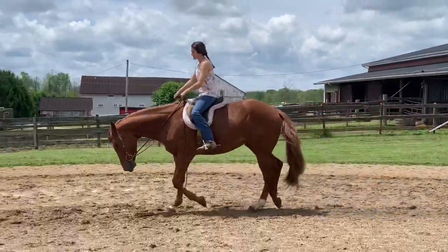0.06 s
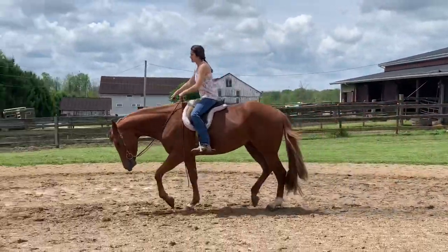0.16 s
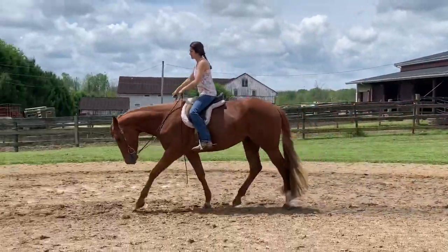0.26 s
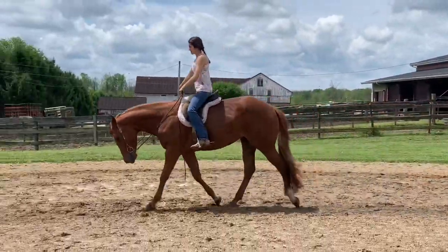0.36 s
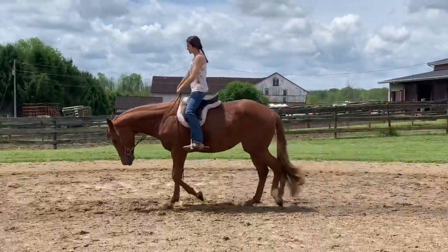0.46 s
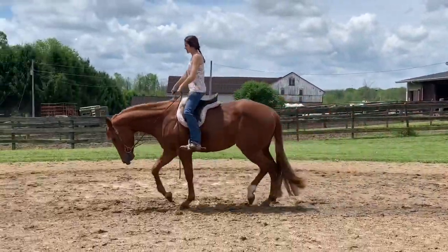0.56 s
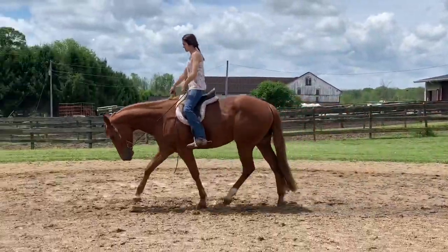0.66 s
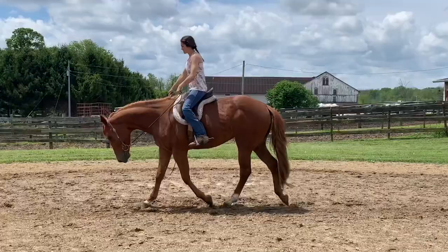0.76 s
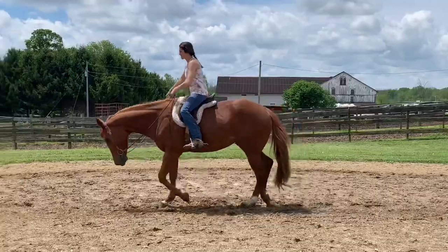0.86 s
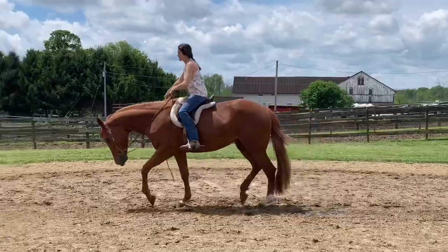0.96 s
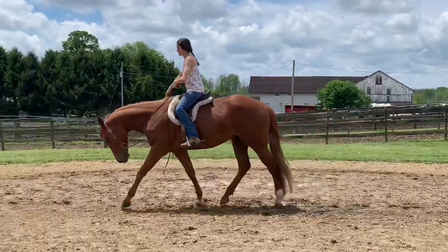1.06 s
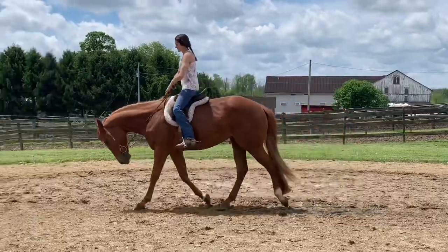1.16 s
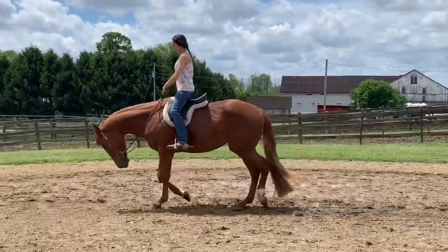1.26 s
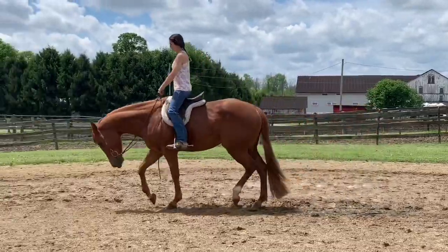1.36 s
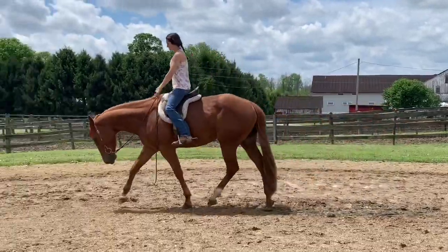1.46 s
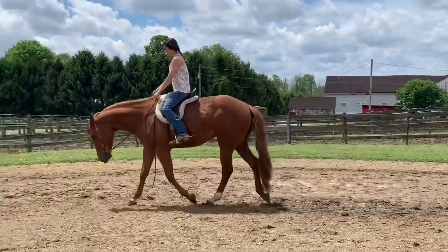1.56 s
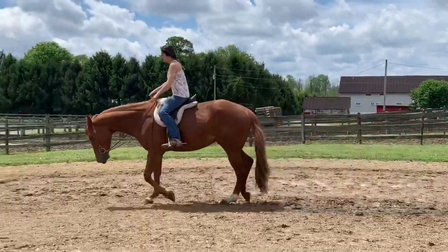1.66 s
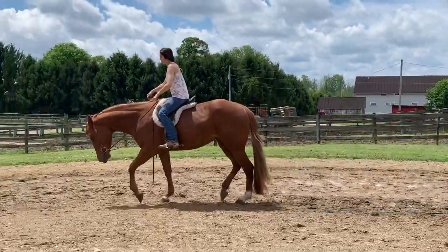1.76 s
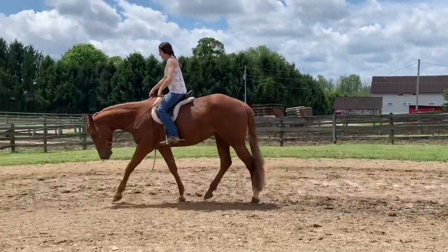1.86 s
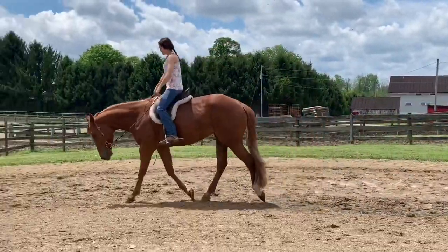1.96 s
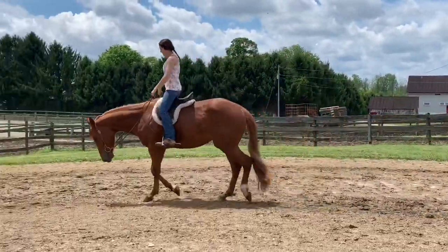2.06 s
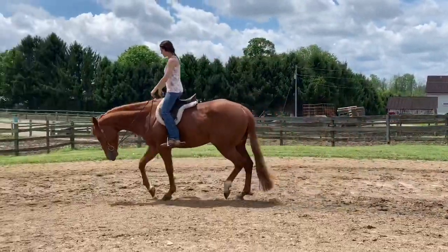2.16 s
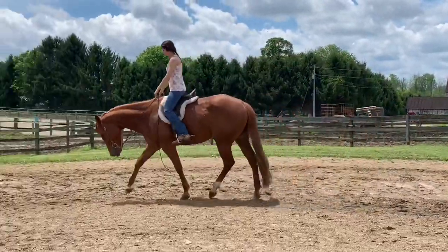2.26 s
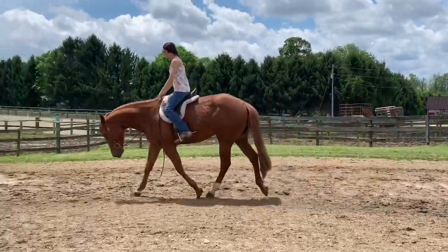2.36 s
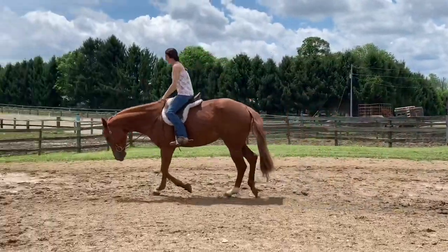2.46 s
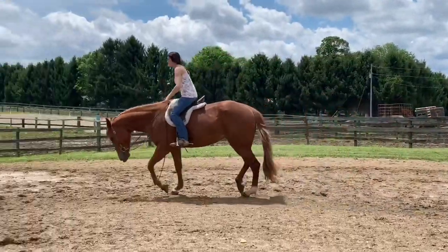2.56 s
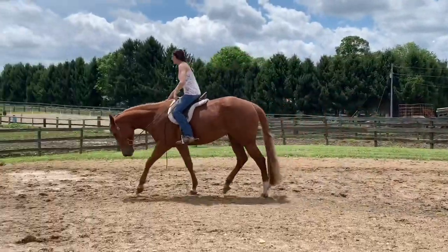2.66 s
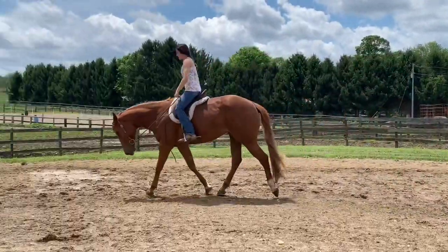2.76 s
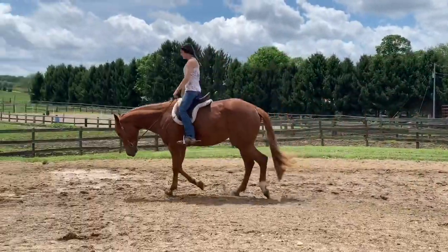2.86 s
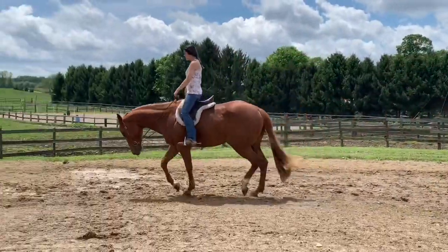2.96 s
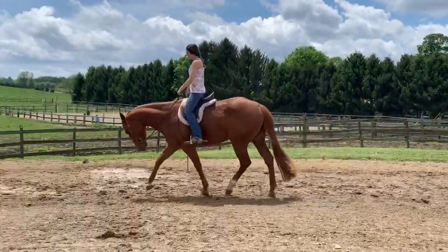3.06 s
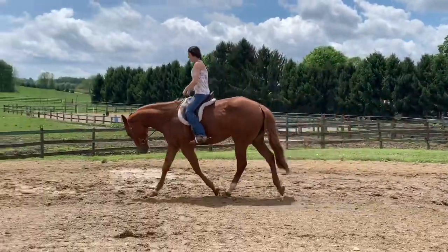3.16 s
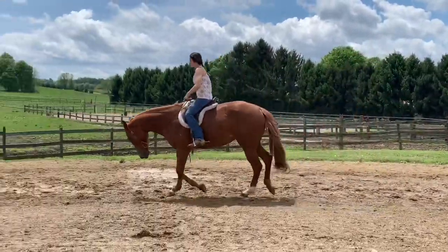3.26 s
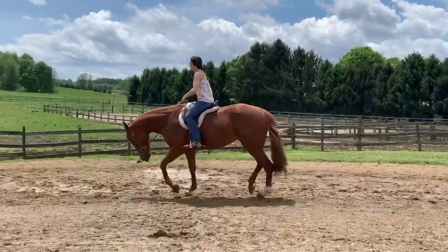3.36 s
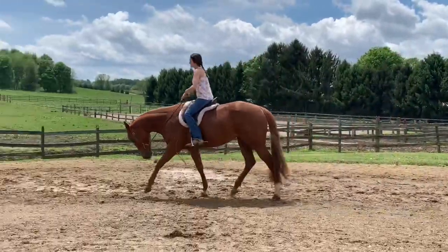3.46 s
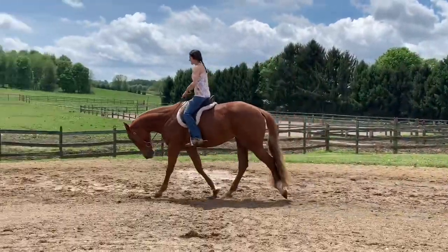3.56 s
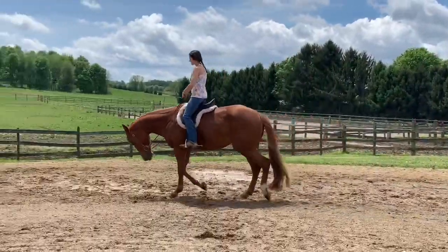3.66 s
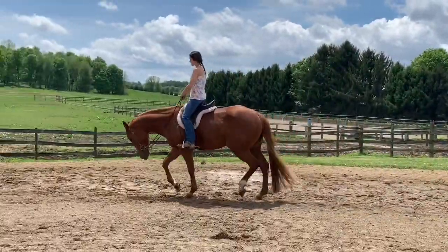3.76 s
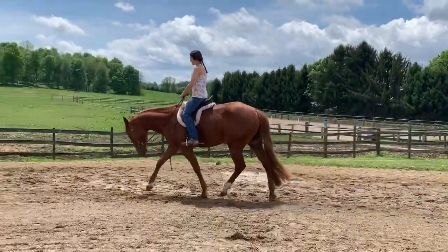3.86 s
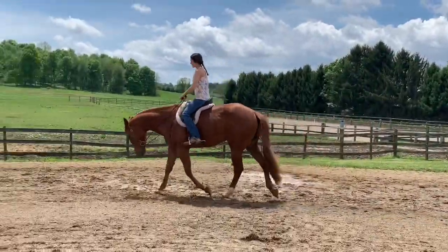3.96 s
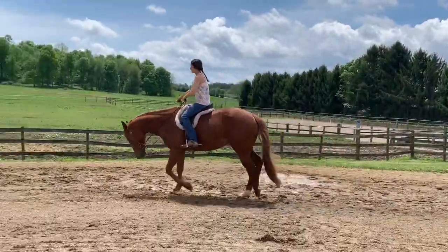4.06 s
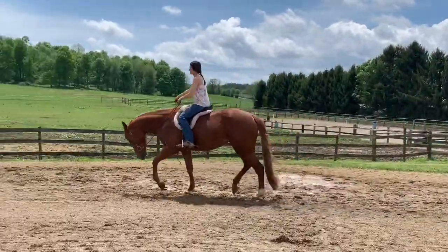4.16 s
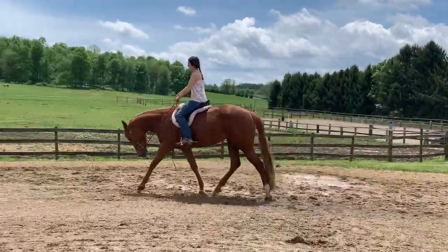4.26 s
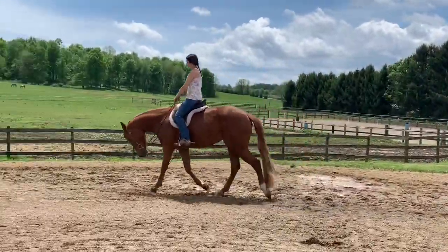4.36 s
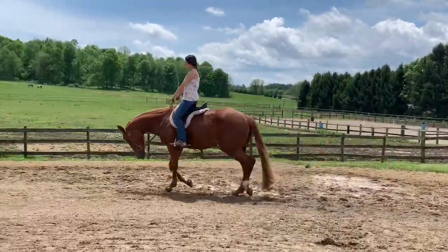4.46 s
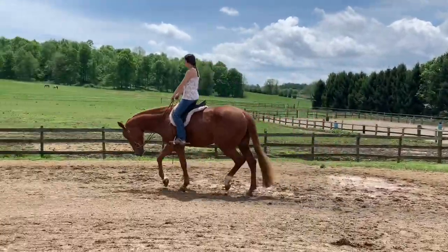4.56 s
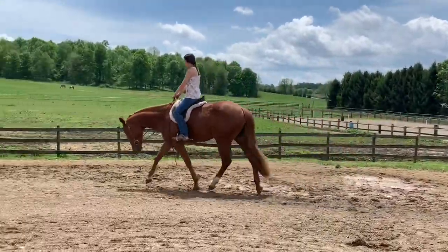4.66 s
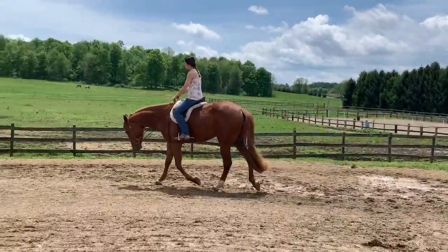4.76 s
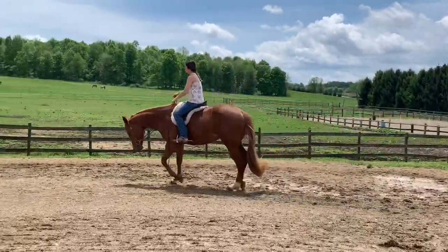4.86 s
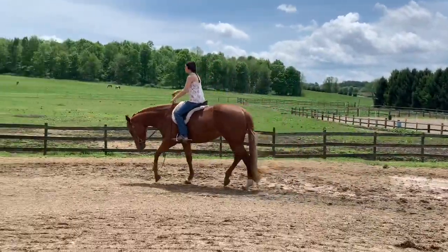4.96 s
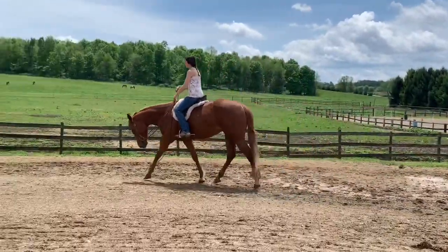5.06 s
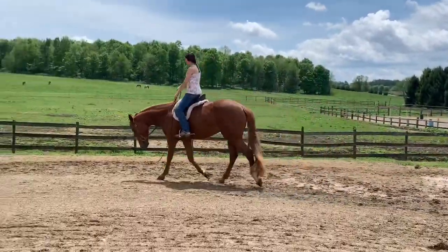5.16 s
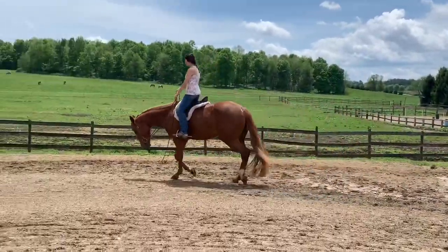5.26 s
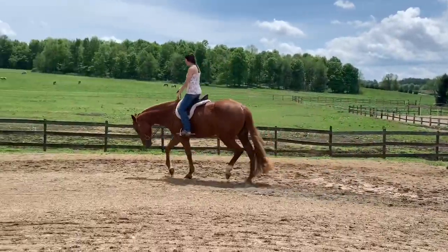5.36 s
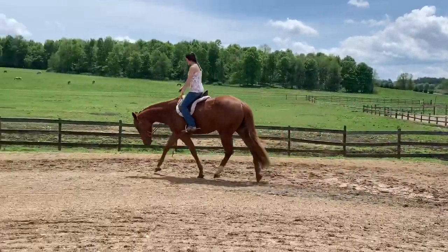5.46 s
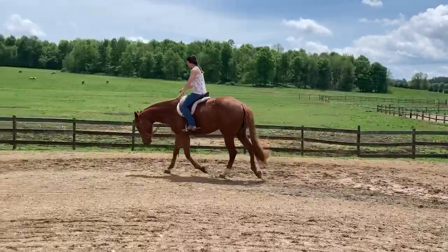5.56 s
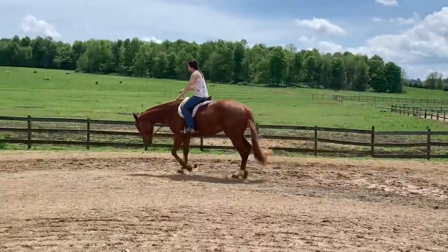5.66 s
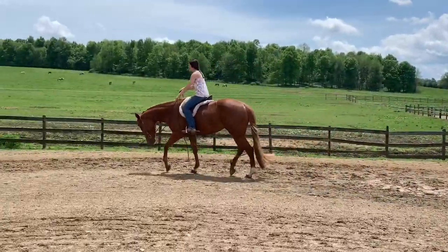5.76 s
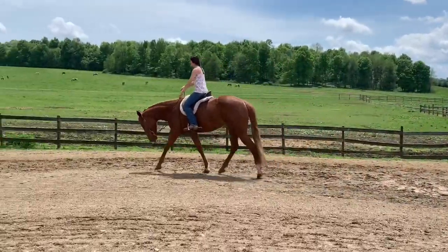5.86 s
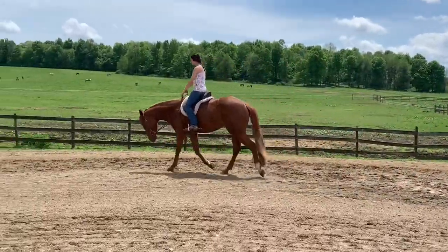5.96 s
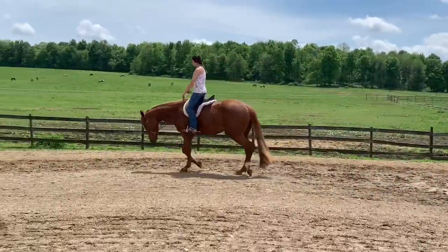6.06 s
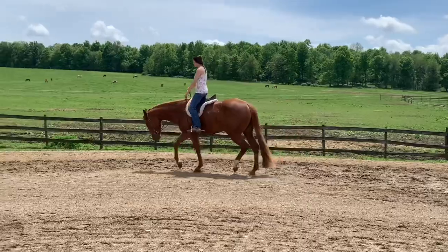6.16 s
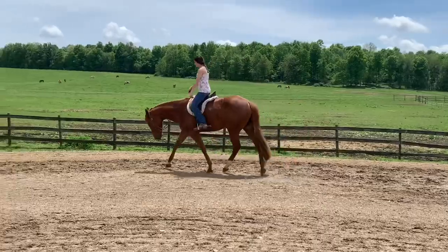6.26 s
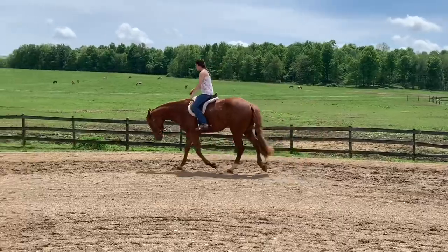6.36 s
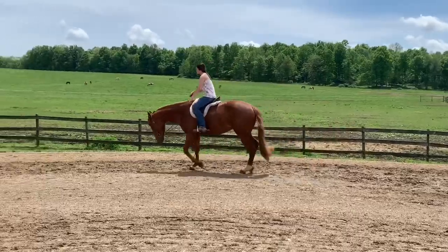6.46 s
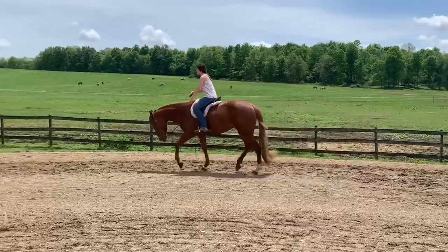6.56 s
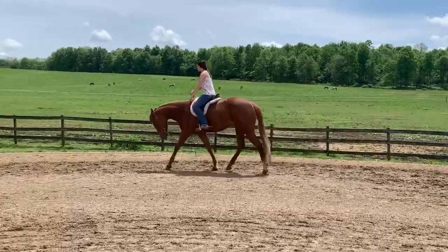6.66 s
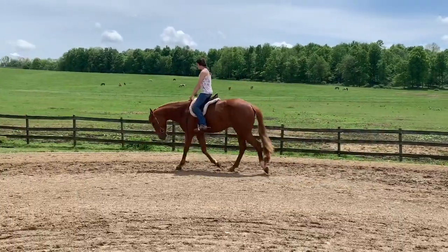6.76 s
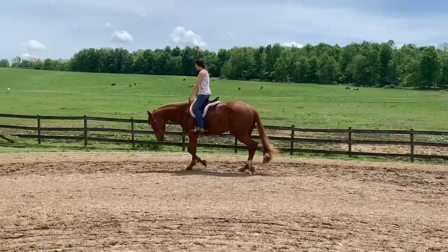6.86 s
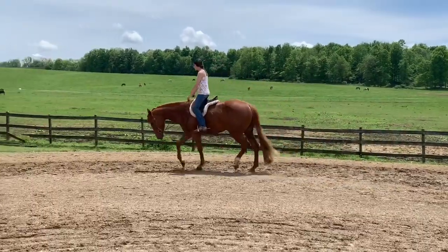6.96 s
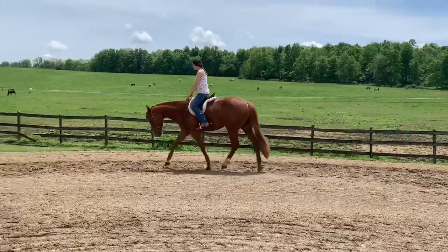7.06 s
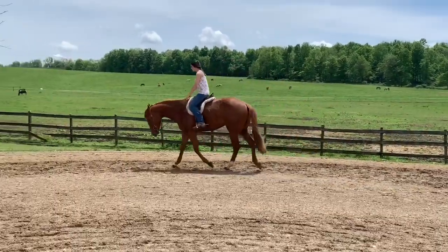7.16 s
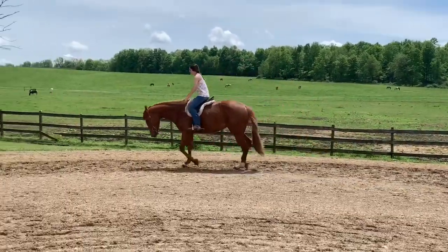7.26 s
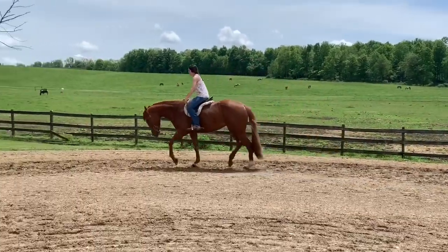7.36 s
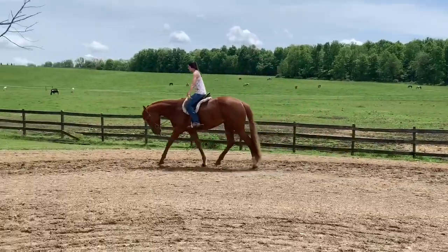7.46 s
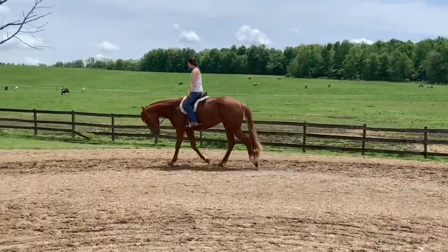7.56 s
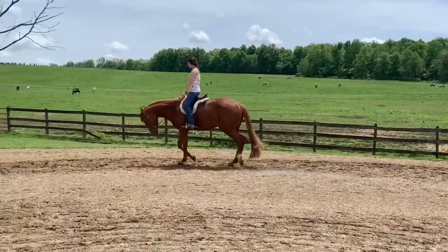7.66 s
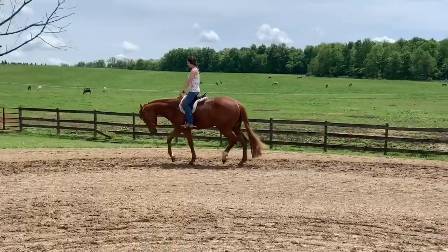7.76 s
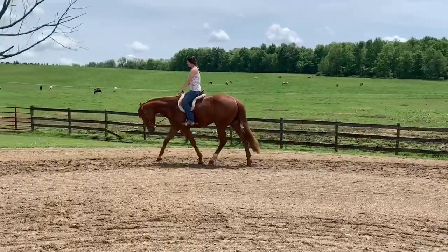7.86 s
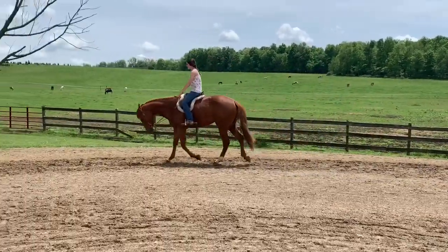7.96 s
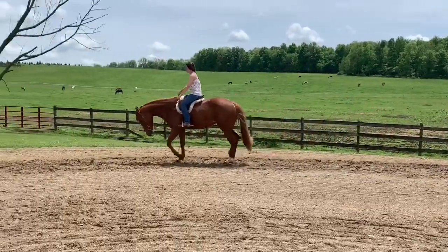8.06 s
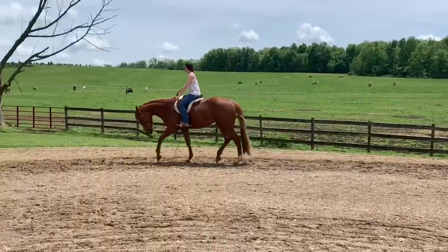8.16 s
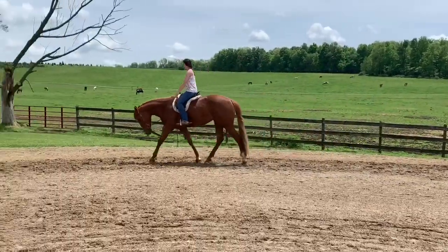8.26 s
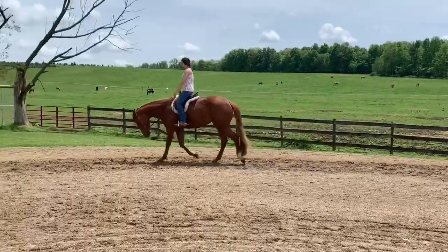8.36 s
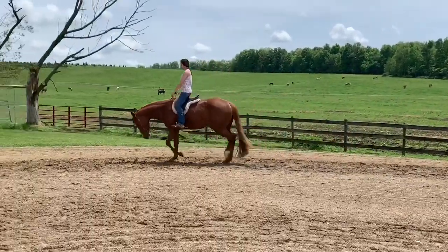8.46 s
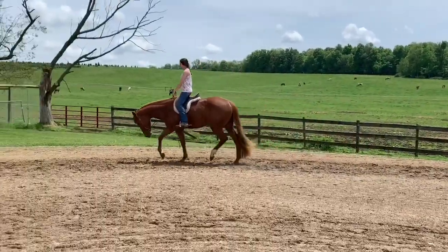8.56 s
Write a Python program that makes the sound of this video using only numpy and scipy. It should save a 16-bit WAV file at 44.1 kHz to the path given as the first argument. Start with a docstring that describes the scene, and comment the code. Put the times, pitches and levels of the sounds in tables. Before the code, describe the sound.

In an open riding arena a phone picks up a horse walking at an easy pace: grit cracking, sand hissing and scuffing, muted thuds, saddle leather creaking and popping. A deep engine hum throbs nearly twice a second, fading toward the end. Sparrow chirps and thin high peeps come and go, then brighter whistled phrases and buzzy calls. The crunching is strongest early and grows lighter later.

```python
"""A beating motor drone, low rumble and hiss run throughout with birds, while a horse walks on dry sand from
the start: hooves thud, crunch and throw up grains, and the saddle creaks and pops.
Drone and birds are sines of moving level and pitch; rumble, hiss and wind are filtered noise.
Sand is a crowd of ringing grains, crunches are noise bursts, thuds are damped modes, and leather is
stick-slip driving resonators. A phone's two microphone ports hear it with lags and coloration."""
import sys
import numpy as np
from scipy import signal
from scipy.fft import rfft, irfft
from scipy.io import wavfile
from scipy.ndimage import uniform_filter1d

SR = 44100
rng = np.random.default_rng(int(sys.argv[2]) if len(sys.argv) > 2 else 0)


def digitize_waveform(pressure):
    """Quantize a signal to 16-bit integers and store it at the path in sys.argv[1].

    Rows of a 2-D input are taken as channels; values are limited to [-1, 1].
    """
    field = np.atleast_2d(pressure).T
    bounded = np.clip(field, -1, 1)
    quanta = np.round(bounded * 32767).astype(np.int16)
    wavfile.write(sys.argv[1], SR, quanta)


N = 379239  # length [samples]

# distant hiss: (frequency [Hz], spectral level [dB])
AIR_COLOUR = [(260, -41), (450, 1.5), (922, 2.5), (2070, 2), (3760, 2), (8540, -18), (10200, -30),
              (12400, -62), (13600, -53), (14800, -36), (16000, -57)]
AIR_DB, AIR_FADE_DB = -55.5, -0.5  # level before swell and flicker; change by the end
# rumble level: (time [s], level [dB])
RUMBLE_LEVEL = [(0, -45.5), (.9, -46), (1.2, -44.5), (1.55, -44.5), (3.4, -45.5), (4.3, -45.5),
                (5.1, -43.5), (6.2, -44), (7.2, -46), (8.6, -47)]
# rumble spectrum: (frequency [Hz], spectral level [dB])
RUMBLE_COLOUR = [(27, -19), (39, -26), (46, -1), (70, -1), (140, -2), (200, -3), (300, -13), (390, -20),
                 (480, -32), (600, -53)]
# murmur near the top of the rumble: (time [s], level [dB])
MURMUR_LEVEL = [(0, -75.5), (4.2, -63.5), (4.8, -59), (6, -63.5), (7.5, -61), (8.1, -65), (8.6, -74)]

# steady low tones: (frequency [Hz], level [dB], wavering depth [dB], change by the end [dB])
LOW_TONES = [(49.3, -49, 2, -2.5), (72.2, -53, 2.5, -1), (122.56, -42, 0.7, -6.5), (151.2, -56, 5, 1),
             (183.2, -48.5, 4, -5.5), (197.6, -49.5, 1, -10), (225.8, -61.5, 4.5, -1.5),
             (273.4, -56.5, 4.5, -9), (309.8, -62.5, 3.5, -5), (365.6, -69.5, 7.5, -7)]
# two beating motor tones: (time [s], upper level [dB], lower level [dB])
DRONE_LEVELS = [(0, -36.5, -48), (1.3, -39.5, -39.5), (2.4, -46, -46.5), (4.2, -43.5, -49), (5.4, -44, -52),
                (6.5, -50, -46), (8.6, -77, -51.5)]
DRONE_HZ, BEAT_S, CANCEL_S = 91.6, 0.5764, 3.285  # upper tone, beat period, a moment of opposition

# wind gusts: (peak time [s], 20 dB rise time [s], 20 dB fall time [s], level [dB])
GUSTS = [(1.2, 0.78, 0.5, -37), (3.1, 1.2, 0.7, -53), (6.3, 1.5, 1.2, -45)]

# near whistling bird: (start [s], length [s], pitch at start [Hz], middle [Hz] and end [Hz],
# level [dB], tilt from start to end [dB])
WHISTLE_NOTES = [(4.56, 0.038, 3370, 3350, 3180, -55.5, 4), (4.588, 0.034, 3160, 2850, 2540, -44.5, 10),
                 (4.624, 0.036, 2534, 2290, 2230, -49, -3), (4.662, 0.025, 2140, 2090, 2010, -49, 8),
                 (4.69, 0.034, 2550, 2450, 2600, -51.5, 3), (4.716, 0.036, 2560, 2800, 2600, -45, -10),
                 (4.758, 0.12, 2070, 2360, 2316, -47.5, 11), (5.16, 0.02, 2920, 2950, 2980, -56, 3),
                 (5.167, 0.037, 2430, 2610, 2830, -46.5, 20), (5.205, 0.037, 2840, 2840, 2830, -50, 0),
                 (5.242, 0.052, 2820, 2840, 2700, -48.5, 19), (5.3, 0.034, 2420, 2460, 2460, -41, -4),
                 (5.332, 0.11, 2510, 2520, 2380, -50.5, -6), (5.7, 0.031, 2530, 2800, 3370, -49, 19),
                 (5.733, 0.047, 3380, 2950, 2700, -36.5, 7), (5.772, 0.022, 2700, 2350, 2230, -38.5, 7),
                 (5.795, 0.061, 2350, 2303, 2170, -41, -10), (5.859, 0.061, 2325, 2433, 2230, -40, 3),
                 (5.92, 0.024, 2040, 2010, 2000, -42, -2), (6.757, 0.019, 2350, 2440, 2480, -56, 14),
                 (6.781, 0.025, 2520, 2660, 2700, -39.5, 14), (6.82, 0.027, 3420, 3380, 3320, -46.5, 4),
                 (6.847, 0.031, 3040, 2910, 2730, -40, -19), (6.878, 0.037, 2040, 2235, 2170, -48, -4),
                 (6.915, 0.044, 2180, 2100, 2080, -44.5, -4), (6.968, 0.053, 3080, 2750, 2570, -38, 14),
                 (7.036, 0.051, 2520, 2465, 2370, -49, 15), (7.1, 0.038, 2590, 2750, 2520, -57, 0),
                 (7.155, 0.031, 2480, 2460, 2460, -65, 0)]
# fast warble of arches: (start [s], length [s], three pitches [Hz], level [dB], tilt [dB])
WARBLE_NOTES = [(6.293, 0.029, 2190, 2600, 2900, -51, 10), (6.322, 0.021, 3020, 3060, 3020, -35.5, 3),
                (6.341, 0.012, 2800, 2400, 1950, -45.5, -3), (6.358, 0.036, 2610, 2790, 1920, -44.5, -6),
                (6.402, 0.0183, 2960, 2830, 2300, -42, -10), (6.422, 0.032, 2250, 2180, 2060, -52, -9)]
# fainter, higher birds: (start [s], length [s], three pitches [Hz], level [dB], tilt [dB])
PEEP_NOTES = [(.075, 0.034, 3190, 3360, 3580, -54, 0), (.11, .105, 3610, 3524, 3390, -56.5, 2),
              (.21, 0.025, 5580, 5530, 5200, -55, 9), (.685, 0.041, 5700, 5460, 5070, -59, -3),
              (.72, 0.048, 3900, 3920, 3920, -57, -11), (1.017, 0.038, 3920, 3910, 3920, -55, 3),
              (1.285, 0.054, 3870, 3840, 3830, -53.5, 0), (1.53, 0.047, 3650, 3840, 3640, -54.5, -3),
              (1.65, 0.085, 7360, 7400, 7440, -71, -5), (1.825, 0.019, 5160, 5160, 5170, -58.5, 3),
              (1.9, 0.026, 5740, 5200, 4750, -57, 2), (2.265, 0.024, 5350, 5270, 5140, -60, -6),
              (2.32, 0.0092, 3440, 3150, 2900, -56, 0), (2.59, 0.07, 6560, 6420, 6380, -59.5, -2),
              (2.695, 0.012, 3380, 3100, 2820, -58, 9), (2.85, 0.02, 4980, 4940, 4870, -58, -2),
              (3.465, 0.027, 5350, 5270, 5170, -66, 0), (2.105, 0.049, 3320, 3480, 3630, -56.5, -1),
              (2.182, .02, 4700, 4950, 5300, -61, 0), (3.175, .025, 2880, 2890, 2860, -62, 5),
              (3.285, 0.037, 3510, 3480, 3450, -61, 9), (3.378, 0.042, 3580, 3950, 4270, -63, -3),
              (3.413, 0.046, 4280, 4200, 4020, -63, -3), (4.272, .025, 4450, 4700, 4850, -59, 0),
              (4.365, .025, 3950, 4200, 4400, -57, 0), (4.41, .03, 3220, 3330, 3500, -54.5, 2),
              (4.752, .055, 3480, 3360, 3500, -61, 0), (4.865, 0.033, 3800, 3860, 3880, -51, 4),
              (4.897, .04, 3880, 4000, 4050, -60, -2), (4.89, .055, 3470, 3330, 3270, -62, 0),
              (5.33, 0.15, 3930, 3620, 3660, -61, -10), (5.58, 0.054, 4160, 4320, 4320, -57, -4),
              (5.868, 0.027, 4420, 4240, 4100, -55, 0), (5.892, 0.034, 4420, 4220, 4210, -54, -10),
              (6.07, 0.059, 3310, 3410, 3370, -58.5, 4), (6.12, 0.094, 3480, 3980, 4180, -60.5, 17),
              (6.2, 0.08, 3310, 3420, 3590, -55.5, -7), (6.555, 0.036, 3160, 2900, 2530, -59, -18),
              (6.585, 0.037, 2750, 3250, 2740, -50, 5), (6.862, 0.015, 4500, 4550, 4600, -58, 0),
              (6.878, 0.017, 4680, 5200, 5700, -63, 0), (7.008, 0.029, 4550, 4400, 4350, -66, 0),
              (7.013, .035, 5500, 5300, 5000, -69, -4), (7.045, 0.02, 4480, 4540, 4470, -57, -4),
              (7.06, 0.013, 4960, 5470, 6000, -56, 5), (7.26, 0.075, 4220, 4330, 4380, -63, 6),
              (7.335, 0.016, 4640, 5400, 5570, -59, 3), (7.53, 0.084, 4010, 4040, 4240, -66, 5),
              (7.795, .07, 5290, 5260, 5130, -69, 2), (7.84, .04, 2820, 2950, 2750, -67, 0)]
# far buzzing bird: (start [s], length [s], three pitches [Hz], level [dB], tilt [dB])
BUZZ_NOTES = [(3.02, 0.4, 4110, 4150, 4100, -72, -13), (4.005, .19, 4990, 4600, 4460, -61.5, 4),
              (4.2, 0.2, 4460, 4160, 3955, -61.5, 8), (4.93, 0.094, 4405, 4730, 5010, -62, -20),
              (5.2, 0.59, 4140, 3740, 3960, -66, -14), (6.27, 0.26, 4610, 4460, 4360, -53, -1),
              (6.5, 0.23, 4400, 4230, 3950, -60.5, -7), (7.36, 0.26, 4440, 4270, 4250, -61.5, -4)]
# shape of one sparrow chirp: (time after start [s], pitch [Hz], level [dB]), before each call's factors
CHIRP_SHAPE = [(0, 3196, -19), (.012, 4170, -12), (.02, 4450, -1), (.036, 4470, 0), (.042, 4200, -16),
               (.05, 3690, -9), (.062, 2980, -6)]
# sparrow calls: (start [s], level [dB], pitch factor [ratio], flank depth factor [ratio])
SPARROW_CALLS = [(-.022, -43, 0.98, 1.4), (0.609, -46.5, 0.99, 0.94), (1.342, -47, 0.98, 1.4),
                 (2.015, -45, 0.97, 0.84), (2.951, -49.5, 0.98, 0.58), (6.5, -41, 0.98, 0.93),
                 (8.417, -42, 0.98, 1.7)]
TRILL_UNEVEN = 0.3  # rms variation of trill pace [share]
SWELL_DB = 3  # softening of each note's ends against its middle; sparrow excepted

# saddle leather under load: (start [s], length [s], level at start [dB], level at end [dB])
CREAKS = [(0.2, 0.053, -50, -45.5), (0.272, 0.25, -57, -50), (0.586, 0.15, -59.5, -53),
          (0.958, 0.29, -53, -53.5), (1.278, 0.012, -55, -47.5), (1.343, 0.34, -56, -63.5),
          (1.821, 0.036, -52, -52), (1.973, 0.24, -53, -52), (2.325, .05, -52, -58),
          (2.446, 0.04, -54, -47), (2.59, 0.37, -55, -52), (3.003, 0.026, -54, -53),
          (3.087, 0.33, -57, -65.5), (3.413, .06, -54.5, -48.5), (3.5, 0.13, -54.5, -49.5),
          (3.655, .085, -52, -50), (3.774, 0.22, -49.5, -58.5), (4.185, 0.45, -50, -51),
          (4.626, 0.27, -53.5, -65), (5.018, 0.026, -47, -58), (5.086, 0.1, -64, -53),
          (5.226, 0.23, -53, -64), (5.481, 0.037, -55, -48.5), (5.633, 0.033, -63, -66),
          (5.76, 0.017, -60, -65), (5.816, 0.13, -57, -64), (5.991, 0.17, -50, -56.5),
          (6.289, 0.037, -50.5, -57), (6.45, .03, -64, -67), (6.624, 0.018, -54, -53),
          (6.782, 0.18, -54, -63), (7.124, 0.069, -55.5, -78), (7.474, 0.04, -63, -55),
          (7.585, 0.17, -59, -53.5), (7.9, 0.025, -52.5, -61), (8.046, 0.011, -59, -66),
          (8.283, 0.21, -60.5, -55)]
CREAK_IN_S, CREAK_OUT_S, CREAK_BED_DB = 0.02, 0.018, -67.5  # times for 20 dB; lowest level
# leather resonances: (frequency [Hz], width [Hz], gain [dB]), before the stretch
LEATHER_MODES = [(720, 220, -0.5), (827.5, 131, 12.5), (899.4, 89, 12), (1093, 41, -6), (1630, 290, -5),
                 (2278, 33, 3)]
# pitch factors of the leather: (slack [ratio], taut [ratio])
STRETCH = (0.85, 1.052)
TIGHTEN = 0.51  # upward drift of tautness by the end [share of the stretch]
# pops of the leather letting go: (time [s], peak level [dB])
POPS = [(0.201, -41), (0.225, -43), (0.479, -36), (0.976, -35), (1.207, -38), (1.29, -44), (1.596, -42),
        (2.142, -40), (2.759, -46), (2.886, -35.5), (3.017, -37.5), (3.616, -34.5), (3.666, -44),
        (3.685, -55), (3.708, -32.5), (3.782, -39.5), (4.186, -54), (4.522, -49), (4.622, -37),
        (4.794, -40.5), (4.843, -44), (5.009, -36), (5.227, -34.5), (5.283, -36), (5.37, -42.5),
        (5.759, -46), (5.977, -43), (6.164, -42), (6.445, -45), (6.948, -43), (7.222, -49), (7.679, -39.5),
        (8.043, -39.5), (8.571, -45)]

# hooves landing flat: (time [s], level before the modes are summed [dB], pitch [Hz], t60 [s])
HOOF_THUDS = [(0.403, -41.5, 340, 0.094), (1.208, -42.5, 306, 0.11), (2.346, -61, 316, 0.18),
              (3.615, -36, 315, 0.11), (4.497, -49.5, 344, 0.13), (4.845, -40, 321, 0.11),
              (5.244, -45.5, 369, 0.18), (5.978, -45.5, 370, 0.32), (6.299, -48.5, 356, 0.29),
              (6.479, -43, 303, 0.16), (7.283, -47, 354, 0.45), (7.508, -40, 319, 0.078),
              (7.898, -50, 384, 0.24)]
# modes of packed ground: (multiple of the pitch [ratio], level [dB])
GROUND_MODES = [(1.001, 2), (1.1, -4.5), (1.21, -17)]

# sand thrown and dragged by a hoof: (peak time [s], 20 dB rise time [s], 20 dB fall time [s],
# spray level [dB], coarse scuff level [dB])
SAND_MOVES = [(0, .02, 0.026, -53, -69), (.07, 0.018, 0.042, -48, -62), (.24, 0.11, .04, -53.5, -72),
              (.33, 0.14, 0.12, -50, -57), (.45, 0.078, 0.11, -47.5, -63),
              (0.693, 0.051, 0.1, -45.5, -56.5), (.84, 0.032, 0.082, -49.5, -60),
              (0.978, 0.03, 0.16, -55, -69), (1.1, 0.05, 0.24, -51, -53), (1.22, 0.22, 0.15, -45.5, -65),
              (1.46, .03, 0.18, -56, -71), (1.601, 0.22, 0.082, -48, -57), (1.8, 0.044, 0.094, -56, -65),
              (1.98, 0.13, 0.19, -49, -51), (2.059, 0.28, 0.096, -48, -72), (2.28, 0.054, .1, -54, -72),
              (2.372, 0.095, 0.019, -50.5, -51), (2.47, 0.065, 0.026, -54, -54),
              (2.62, 0.25, 0.16, -69, -60.5), (2.78, 0.11, 0.11, -50.5, -54), (3.16, 0.32, 0.12, -49, -55),
              (3.28, 0.073, 0.15, -55, -65), (3.541, 0.15, 0.067, -49, -52.5),
              (3.66, 0.044, 0.11, -53, -76), (3.93, 0.15, 0.11, -48, -52),
              (4.31, 0.073, 0.096, -50.5, -49.5), (4.41, 0.076, 0.24, -55, -73),
              (4.72, 0.037, 0.043, -51.5, -48.5), (4.79, 0.089, 0.12, -52.5, -59),
              (5.2, 0.52, .1, -63.5, -58.5), (5.249, 0.074, 0.051, -45, -53),
              (5.51, 0.069, 0.036, -46, -49), (5.648, 0.06, 0.036, -47.5, -48.5),
              (5.77, 0.032, 0.098, -51.5, -70), (6.029, 0.28, 0.19, -51, -57),
              (6.32, 0.088, 0.039, -51, -53.5), (6.469, 0.039, 0.022, -49, -61),
              (6.59, 0.11, .015, -64, -70), (6.82, 0.16, 0.13, -48.5, -51.5),
              (7.04, 0.076, 0.034, -54, -73), (7.11, 0.033, 0.27, -60.5, -64), (7.6, 0.6, 0.11, -63, -63.5),
              (7.93, 0.18, 0.051, -57.5, -58), (8.05, 0.034, 0.047, -63, -75),
              (8.26, 0.049, 0.41, -55.5, -56.5), (8.329, 0.12, 0.094, -62, -51),
              (8.41, 0.16, 0.13, -52.5, -67), (8.6, 0.17, 0.084, -66, -57)]
# spectrum of the spray: (frequency [Hz], gain [dB])
SPRAY_COLOUR = [(1500, -60), (3000, -2), (5000, 4.5), (7000, -1.5), (9000, 11), (11000, 8.5), (13500, 12),
                (16000, -9.5)]
SCUFF_BED_DB, SCUFF_FADE_DB = -63.5, -19.5  # trickle of loose sand; change by the end
# grit cracking under a hoof: (time [s], level before snap and trim [dB], t60 [s],
# middle drive relative to that [dB], knock drive relative to that [dB])
CRACKS = [(0.063, -35, 0.07, -18, -21), (0.2, -38, 0.037, -15, 1), (0.2287, -26.5, 0.032, -20, -22),
          (0.32, -34, 0.098, -29, -17), (0.405, -38.5, 0.035, -9, 14.5), (0.682, -25.5, 0.026, -28, -23),
          (0.824, -39, 0.065, -11, -5), (0.9715, -27, 0.062, -28, -20), (1.1383, -32, 0.056, -23, -19),
          (1.205, -30, 0.021, -27, -2), (1.2233, -19, 0.044, -38, -24), (1.278, -27.5, 0.032, -24, -24),
          (1.348, -31, 0.02, -34, -21), (1.371, -26.5, 0.031, -32, -23), (1.46, -30, 0.033, -20, -26),
          (1.487, -34, 0.044, -13, -23), (1.523, -43, 0.082, -12, 6), (1.5947, -35, 0.024, -9, -3),
          (1.788, -29, 0.022, -21, -56), (1.841, -30.5, 0.032, -37, -21), (2.001, -30, 0.1, -17.5, -16),
          (2.046, -27.5, 0.034, -13, -25), (2.083, -35, 0.051, -11, -20), (2.26, -27, 0.045, -24, -27),
          (2.449, -34.5, 0.076, -5.5, -17), (2.463, -43, .02, -1, -5), (2.476, -39, 0.027, 1.5, -5),
          (2.757, -51, .12, -5, 10), (2.6024, -27, 0.023, -16.5, -26), (2.825, -38, 0.071, -7.5, 0),
          (2.856, -33.5, 0.032, -15, -16), (2.9352, -36, 0.037, -21, -6), (3.1454, -33.5, 0.034, -24, 0),
          (3.267, -36, 0.062, -19, -23), (3.4504, -31.5, 0.053, -21, -20), (3.478, -34, 0.043, -28, -22),
          (3.534, -45, 0.15, -2.5, -10), (3.614, -35, 0.06, -7.5, 0.5), (3.652, -37, 0.15, -27, -21),
          (3.8731, -53, 0.056, -13, -12), (3.9674, -37, 0.04, -23, -11), (4.0674, -38, 0.11, -19, -17),
          (4.148, -49, 0.018, -25, -25), (4.195, -52, 0.031, -22, -22), (4.41, -40.5, 0.046, -5.5, -14),
          (4.454, -42, .04, -20, -20), (4.472, -40, .02, -24, -24), (4.787, -35, 0.07, -17, -18),
          (4.843, -37.5, 0.056, -6.5, -14), (5.176, -39, 0.026, -8, -13), (5.214, -37, 0.082, -23, -20),
          (5.455, -41, 0.06, -19, -1), (5.763, -30, 0.032, -20, -7.5), (5.873, -44.5, .04, -2, -18),
          (6.023, -30, 0.036, -22, -22), (6.04, -29.5, 0.063, -17, -20), (6.076, -40, .02, -3, -14),
          (6.092, -44, .02, -20, -20), (6.24, -53, 0.013, -20, -20), (6.272, -37, 0.072, -17, -8),
          (6.447, -41.5, 0.073, -7, 4), (6.577, -35, 0.062, -15, -21), (6.671, -48, 0.059, -11, -17),
          (6.766, -32.5, 0.028, -23, -20), (6.818, -38.5, .03, -3, 0), (6.857, -30, 0.018, -20, -17),
          (6.9063, -41, 0.044, -25, -17), (6.991, -32.5, 0.039, -14, -14), (7.2213, -50, 0.15, 1, -4),
          (7.376, -36.5, 0.023, -12, -28.5), (7.597, -48, .04, -1, -8), (7.6774, -48, 0.044, -19, -12),
          (7.769, -54, 0.033, -2, 10), (7.89, -52, 0.054, -4, 0), (8.0407, -46.5, 0.1, -8, 7),
          (8.161, -43, 0.046, -9, 1), (8.249, -41, 0.19, -28, -1.5), (8.432, -25, 0.02, -27, -18),
          (8.586, -39.5, 0.042, -25, -22)]
SNAP_T60_S, SNAP_DB = 0.005, 4  # extra gain in the first instant of each crack

# the two microphone ports: (frequency [Hz], phase by which left leads [rad])
PORT_PHASE = [(0, 0), (900, 0.44), (1700, 0.5), (2500, 1), (3000, 1.7), (3800, 1), (5400, 1.7), (6500, -.1),
              (7700, -2.6), (9300, -3.7), (10700, -6.2), (11600, -6.6), (12900, -9.3), (14200, -9.6),
              (15300, -12.5), (16500, -12.6)]
# correlation of the ports in the far field: (frequency [Hz], likeness before limiting to -1..1)
PORT_LIKENESS = [(60, 0.73), (300, 0.8), (640, -0.16), (1400, -2), (3000, 0), (5500, -0.85), (8000, -0.7),
                 (15000, -5)]
# colour of the phone and the ground below it: (frequency [Hz], gain [dB])
PHONE_COLOUR = [(1200, -3), (1700, 2), (2060, -5.5), (2400, 0.5), (2900, -4.5), (3600, -1), (4600, -0.5),
                (5500, -1.5), (7000, 0.5), (13000, -6.5), (14000, -14.5), (15200, 5.5), (16000, -15)]
TOP_HZ = 16300  # low-pass edge


def undb(db):
    """Amplitude is ten to the power of a twentieth of the level in dB."""
    return 10 ** (np.asarray(db) / 20)


def unit(x):
    """Normalization: the rms becomes one."""
    return x / np.sqrt(np.mean(x ** 2))


def curves(table):
    """Linear interpolation of a table's columns over time."""
    s, *columns = np.transpose(table)
    return [np.interp(np.arange(N) / SR, s, c) for c in columns]


def over_hz(points):
    """Interpolation on the frequency bins, straight on a log axis."""
    hz, value = np.transpose(points)
    bins_hz = np.arange(N // 2 + 1) * SR / N
    return np.interp(np.log(bins_hz + 1), np.log(hz + 1), value)


def colour(x, points):
    """Spectral shaping: each frequency bin is scaled by a gain curve."""
    return unit(irfft(rfft(x) * undb(over_hz(points)), N))


def band(x, lo_hz, hi_hz):
    """Band-pass filtering with gentle slopes."""
    return signal.sosfilt(signal.butter(2, [lo_hz, hi_hz], "bandpass", fs=SR, output="sos"), x)


def walk(rate):
    """Smoothed random modulation: levels held 1 / rate s and slewed twice."""
    k = int(SR / rate)
    held = np.repeat(rng.standard_normal(N // k + 1), k)
    return uniform_filter1d(uniform_filter1d(held, k), k)[:N]


def wide(points):
    """Partial coherence: coloured noise whose likeness between ports depends on frequency."""
    like = np.clip(over_hz(PORT_LIKENESS), -1, 1)
    noise = rfft(rng.standard_normal((2, N)))
    mid, side = noise * np.sqrt([1 + like, 1 - like]) * undb(over_hz(points))
    return unit(irfft(np.array([mid + side, mid - side]), N))


def swells(peak_s, rise_s, fall_s, db):
    """Exponential growth and decay about each peak; the loudest event at any moment prevails."""
    level_db = np.full(N, -120.)
    t = np.arange(N) / SR
    for s, rise, fall, top in zip(peak_s, rise_s, fall_s, db):
        near = slice(max(int((s - 3 * rise) * SR), 0), int((s + 3 * fall) * SR))
        distance = np.maximum((s - t[near]) / rise, (t[near] - s) / fall)
        level_db[near] = np.maximum(level_db[near], top - 20 * distance)
    return undb(level_db)


def place(x, pan_db, lag_s, wet_db, t60):
    """Level and delay differences between the ports, with a scattered, decaying tail."""
    t = np.arange(int(.5 * SR)) / SR
    tail = rng.standard_normal((2, len(t))) * undb(-60 * t / t60) * (t > t60 / 40)
    tail = tail / np.sqrt(np.sum(tail ** 2) / 2)
    wet = signal.fftconvolve(x[None], tail, axes=1)[:, :N]
    late = np.interp(np.arange(N) - lag_s * SR, np.arange(N), x)
    return np.array([late * undb(pan_db / 2), x * undb(-pan_db / 2)]) + undb(wet_db) * wet


def open_air():
    """Broadband noise with band-wise modulation: a hiss swells as a whole and each band flickers alone."""
    hiss = wide(AIR_COLOUR)
    swell_db = 1.8 * walk(1.49) + AIR_FADE_DB * (np.arange(N) / N) ** 4
    edges = 400 * 2 ** np.arange(0, 5.6, .5)  # half octaves [Hz]
    flicker_db = 2.5
    bands = (band(hiss, lo, hi) * undb(swell_db + flicker_db * walk(9)) for lo, hi in zip(edges, edges[1:]))
    return undb(AIR_DB) * sum(bands)


def rumble():
    """Low-frequency noise, partly coherent between the ports and randomly modulated."""
    return wide(RUMBLE_COLOUR) * undb(curves(RUMBLE_LEVEL)[0] + 2 * walk(8.1))


def murmur():
    """Narrow-band noise, whose level fluctuates restlessly."""
    noise = band(band(rng.standard_normal(N), 296, 388), 335, 434)
    return unit(noise) * undb(curves(MURMUR_LEVEL)[0] + 4.35 * walk(14))


def motor():
    """Beating of two close tones, among low tones that waver quickly in level and drift slightly in pitch."""
    upper_db, lower_db = curves(DRONE_LEVELS)
    t = np.arange(N) / SR - CANCEL_S
    upper = undb(upper_db + 1 * walk(5.1)) * np.sin(2 * np.pi * DRONE_HZ * t)
    lower = undb(lower_db + 1.5 * walk(6.9)) * np.sin(2 * np.pi * (DRONE_HZ - 1 / BEAT_S) * t)
    out = upper - lower
    for hz, db, waver_db, end_db in LOW_TONES:
        phase = 2 * np.pi * np.cumsum(hz * (1 + 0.005765 * walk(3))) / SR
        level_db = db + waver_db * np.tanh(walk(14)) + end_db * np.arange(N) / N
        out = out + undb(level_db) * np.sin(phase + 2 * np.pi * rng.random())
    return np.sqrt(2) * out


def wind():
    """Turbulence noise: deep, uneven buffeting on the phone, partly different at each port."""
    noise = rng.standard_normal((2, N)) * 0.48 + rng.standard_normal(N)
    blow = band(band(noise, 36, 100), 39, 116)
    return unit(blow) * swells(*np.transpose(GUSTS)) * undb(3.8 * walk(12))


def note(rows, blur_hz, edge_s, trill_hz=0, sweep_hz=0):
    """Frequency modulation: a sine follows a pitch curve, blurred by noise and swept by a trill."""
    s, hz, db = np.transpose(rows)
    i = np.arange(max(int(s[0] * SR), 0), min(int(s[-1] * SR), N))
    t = i / SR
    wobble = blur_hz * unit(uniform_filter1d(rng.standard_normal(len(i)), size=40))
    uneven = unit(uniform_filter1d(rng.standard_normal(len(i)), size=300))
    pace = trill_hz * (1 + TRILL_UNEVEN * uneven)
    wobble = wobble + sweep_hz * np.sin(2 * np.pi * np.cumsum(pace) / SR)
    edge = np.clip(np.minimum(t - s[0], s[-1] - t) / edge_s, 0, 1)
    phase = 2 * np.pi * np.cumsum(np.interp(t, s, hz) + wobble) / SR
    out = np.zeros(N)
    out[i] = np.sqrt(2) * edge * undb(np.interp(t, s, db)) * np.sin(phase)
    return out


def song(table, blur_hz, edge_s, trill_hz=0, sweep_hz=0):
    """Pitch glides: notes bend along a parabola through three pitches and swell in the middle."""
    u, out = np.linspace(-1, 1, num=9), 0
    for s, length, first_hz, middle_hz, last_hz, db, tilt_db in table:
        bend_hz = (first_hz + last_hz) / 2 - middle_hz
        hz = middle_hz + u * (last_hz - first_hz) / 2 + u ** 2 * bend_hz
        level_db = db + tilt_db * u / 2 - SWELL_DB * u ** 2
        rows = np.transpose([s + length * (u + 1) / 2, hz, level_db])
        out = out + note(rows, blur_hz, edge_s, trill_hz, sweep_hz)
    return out


def sparrow():
    """Reflection: one repeated chirp is followed by a weaker, delayed copy."""
    out = 0
    for s, db, pitch, flank in SPARROW_CALLS:
        rows = np.array(CHIRP_SHAPE) * [1, pitch, flank] + [s, 0, db]
        out = out + note(rows, 112, 0.00092, 258, 85)
    return out + undb(-10.0) * np.roll(out, int(0.057 * SR))  # echo off the barn


def birds():
    """Direct-to-scattered ratio and port differences give each singer its own place and distance."""
    near = song(WHISTLE_NOTES, 35, 0.0029) * undb(3.3 * walk(90))
    near = near + song(WARBLE_NOTES, 106, 0.0026, 187, 110) * undb(2.5 * walk(120))
    far = song(PEEP_NOTES, 55, 0.0043) * undb(2.4 * walk(60))
    buzz = song(BUZZ_NOTES, 232, 0.019, 110, 500) * undb(4.9 * walk(60))
    return (place(near, -1.6, .00005, -9.5, 0.33) + place(far, -1.4, .00002, -4, 0.25)
            + place(sparrow(), -4.0, .00004, -2.0, 0.13) + place(buzz, -1.8, .00002, -0.19, 0.37))


def leather(factor):
    """Impulse response: the damped resonances of the saddle after one tap."""
    ring, tap = 0, signal.unit_impulse(2048)
    for hz, width, db in LEATHER_MODES:
        broad = signal.lfilter(*signal.iirpeak(hz * factor, hz / width / 3, SR), tap)
        ring = ring + undb(db) * signal.lfilter(*signal.iirpeak(hz * factor, hz / width, SR), broad)
    return ring


def strain():
    """Load envelope of the leather: a quick start, a sloping hold, a release."""
    level_db, t = np.full(N, 1. * CREAK_BED_DB), np.arange(N) / SR
    for s, length, first_db, last_db in CREAKS:
        knots = [s - 2 * CREAK_IN_S, s, s + length, s + length + 2 * CREAK_OUT_S]
        load_db = np.interp(t, knots, [first_db - 40, first_db, last_db, last_db - 40])
        level_db = np.maximum(level_db, load_db)
    return undb(level_db)


def saddle():
    """Stick-slip friction: uneven slips drive dull leather resonances at a wandering pitch, with pops."""
    size = undb(3.2 * walk(120) + 1.8 * walk(20))
    slip_count = np.floor(np.cumsum(88 * (1 + 0.43 * walk(45))) / SR)  # about 88 slips a second
    slips = np.diff(slip_count, prepend=0) * size
    # each slip is a brief scrape, so no two ring with the same colour
    scrape = signal.lfilter([1], [1, -np.exp(-1 / (0.0032 * SR))], slips) * rng.standard_normal(N)
    rub = slips + 0.51 * scrape + 0.089 * rng.standard_normal(N)
    tautness = np.clip(.42 + TIGHTEN * (np.arange(N) / N) ** 2 + 0.5 * walk(14), 0, 1)
    angle = tautness * np.pi / 2  # equal-power crossfade
    slack_ring, taut_ring = (leather(k) for k in STRETCH)
    creak = signal.fftconvolve(rub * np.cos(angle), slack_ring)
    creak = creak + signal.fftconvolve(rub * np.sin(angle), taut_ring)
    s, db = np.transpose(POPS)
    pops, ring = np.bincount((s * SR).astype(int), undb(db), N), leather(1)
    return unit(creak[:N]) * strain() + signal.fftconvolve(pops, ring / np.abs(ring).max())[:N]


def thuds():
    """Modal decay: packed ground rings in a damped cluster, and the sand softens the landing."""
    out, t = np.zeros(N + 8192), np.arange(8192) / SR
    soft_start = np.sin(np.minimum(t / 0.0066, 1) * np.pi / 2) ** 2
    for s, db, hz, t60 in HOOF_THUDS:
        ring = sum(undb(mode_db) * np.sin(2 * np.pi * k * hz * t) for k, mode_db in GROUND_MODES)
        out[int(s * SR):][:8192] += soft_start * undb(db - 60 * t / t60) * ring
    return out[:N]


def grains(rate, spread_db):
    """Random impulse process: lone clicks, a few much larger than the rest."""
    clicks = (rng.random(N) < rate / SR) * rng.standard_normal(N)
    return clicks * undb(spread_db * np.minimum(rng.exponential(size=N), 3))


def pebbles(lo_hz, hi_hz, cycles, spread_db, count):
    """Superposed resonances: each grain rings a few cycles at its own pitch."""
    when, pitch, size = rng.random((count, 3)).T
    hz = (lo_hz * (hi_hz / lo_hz) ** pitch)[:, None]
    t = np.arange(512) / SR
    gain = undb(-spread_db * np.log(size + 0.0097))[:, None]
    rings = gain * np.sin(2 * np.pi * hz * t) * np.exp(-hz * t / cycles)
    samples = (when * N).astype(int)[:, None] + np.arange(512)
    return unit(np.bincount(samples.ravel(), rings.ravel(), N + 512)[:N])


def sand():
    """Granular collision noise: fine grains hiss, patter and ring; coarser clods scuff lower down."""
    *timing, spray_db, scuff_db = np.transpose(SAND_MOVES)
    smear = np.exp(-np.arange(400) / SR / 0.024) * rng.standard_normal(400)
    patter = unit(signal.fftconvolve(grains(250, 5.2), smear)[:N]) + 0.39 * rng.standard_normal(N)
    patter = patter + .9 * pebbles(3000, 15500, 22, 2.6, count=5000)
    spray = colour(patter, SPRAY_COLOUR) * swells(*timing, spray_db) * undb(2.54 * walk(50))
    rasp = unit(band(rng.standard_normal(N), 960, 3050))
    scuff = unit(pebbles(719, 3980, 4.1, 3.9, count=2300) + 0.63 * rasp)
    trickle = undb(SCUFF_BED_DB + SCUFF_FADE_DB * np.arange(N) / N)
    return spray + scuff * (swells(*timing, scuff_db) + trickle)


def crunch():
    """Transient fracture noise: each crack is a short burst of grit with a duller knock under it."""
    high, middle, knock = np.zeros((3, N))
    t = np.arange(4096) / SR
    snap = 1 + undb(SNAP_DB - 60 * t / SNAP_T60_S)
    for s, db, t60, middle_db, knock_db in CRACKS:
        i = int(s * SR)
        shape = (np.minimum(t / 0.0015, 1) * undb(db - 60 * t / max(t60, .004)))[:N - i]
        high[i:i + 4096] += shape * snap[:N - i]
        middle[i:i + 4096] += shape * undb(middle_db)
        knock[i:i + 4096] += shape * undb(knock_db)
    grit = rng.standard_normal((3, N))
    bright = undb(-6.0) * high * unit(band(grit[0], 8560, 13400))
    body = middle * unit(band(grit[1], 1620, 5270))
    return bright + body + band(knock * grit[2], 270, 2670)


def ports(pair):
    """Interchannel phase: the two ports hear the treble with a lag between them."""
    turn = np.exp(.5j * over_hz(PORT_PHASE))
    return irfft(rfft(pair) * np.array([turn, 1 / turn]), N)


def scene():
    """Superposition of the background, the birds and the horse at the two ports."""
    low = (motor() + murmur() + rumble()) * undb([[-.85], [.85]])
    # uneven ground scatters the grit differently to each port
    grit = place(sand() + crunch(), 0.073, 0, -7.0, 0.0676)
    horse = grit + thuds() + saddle() * undb([[.4], [-.4]])
    return low + wind() + birds() + ports(open_air() + horse)


def record(dry):
    """Linear filtering: the phone colours the middle and treble and cuts the top."""
    heard = irfft(rfft(dry) * undb(over_hz(PHONE_COLOUR)), N)
    return signal.sosfilt(signal.ellip(8, .2, 70, TOP_HZ, fs=SR, output="sos"), heard)


dry = scene()
out = record(dry)
digitize_waveform(out)
```